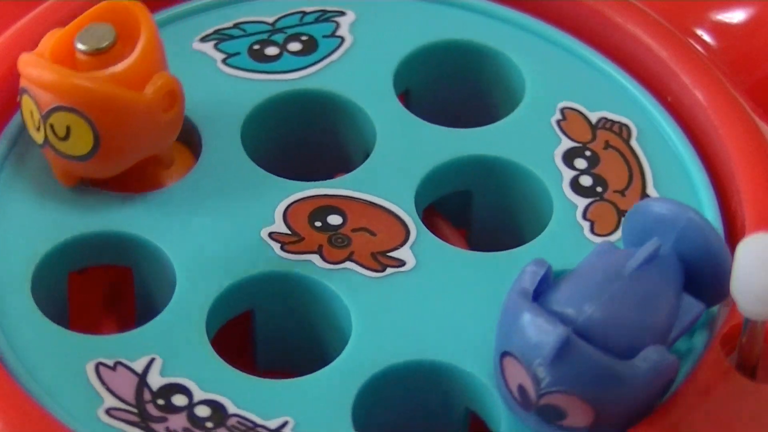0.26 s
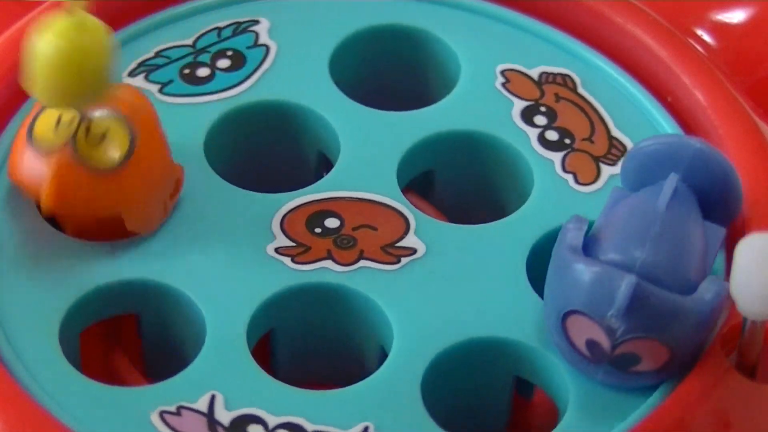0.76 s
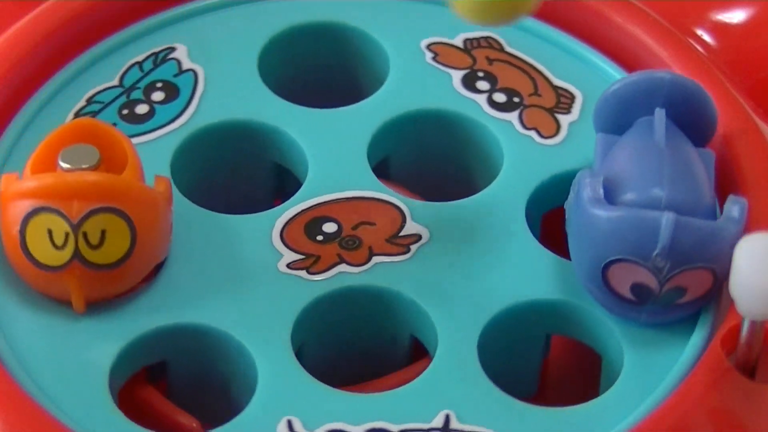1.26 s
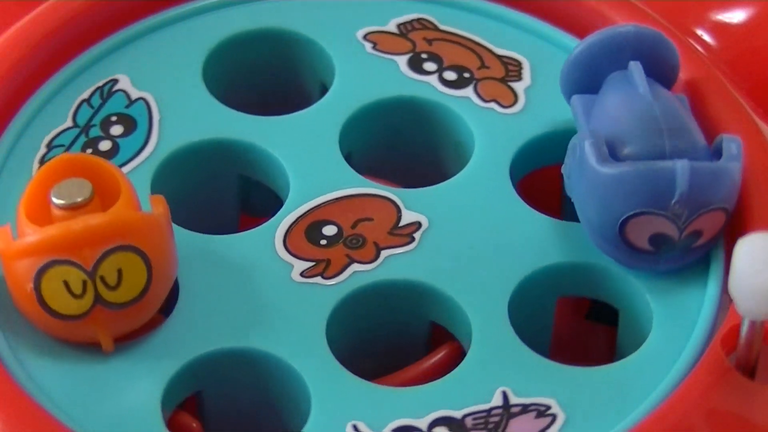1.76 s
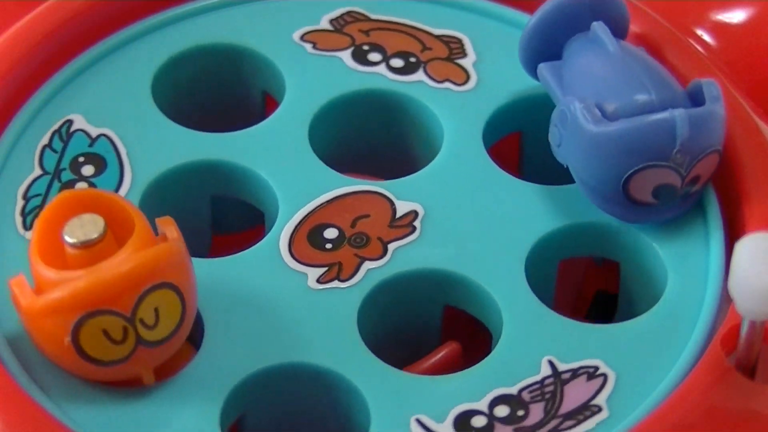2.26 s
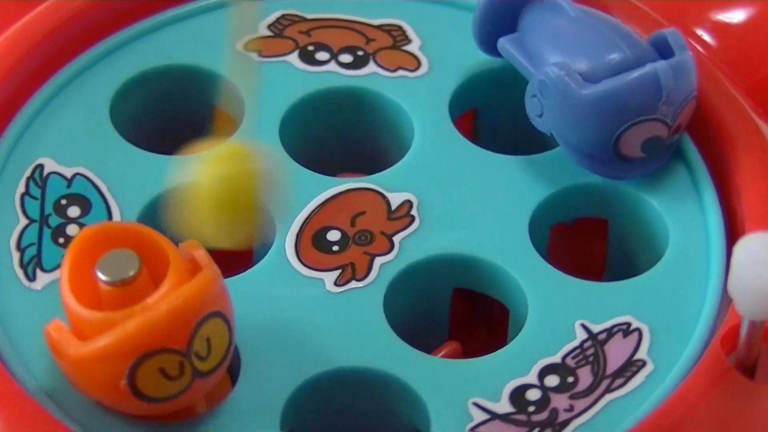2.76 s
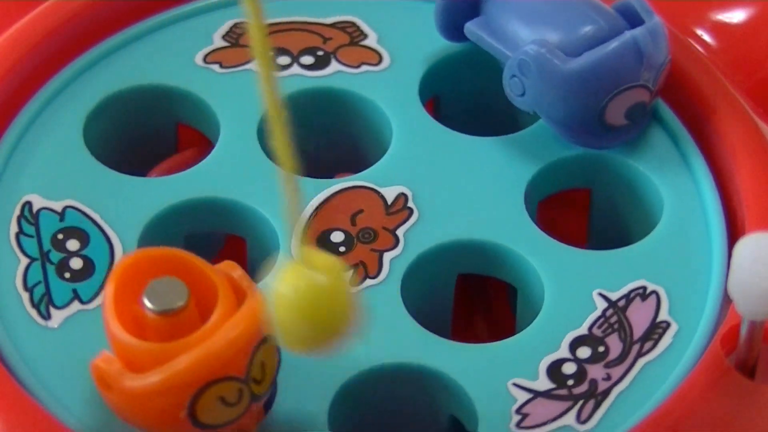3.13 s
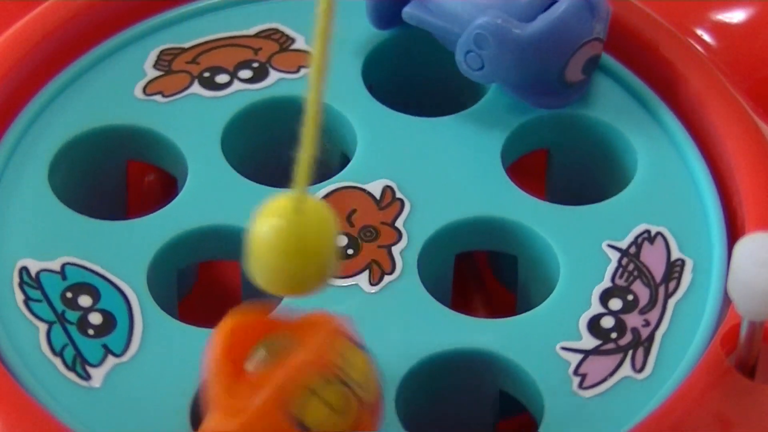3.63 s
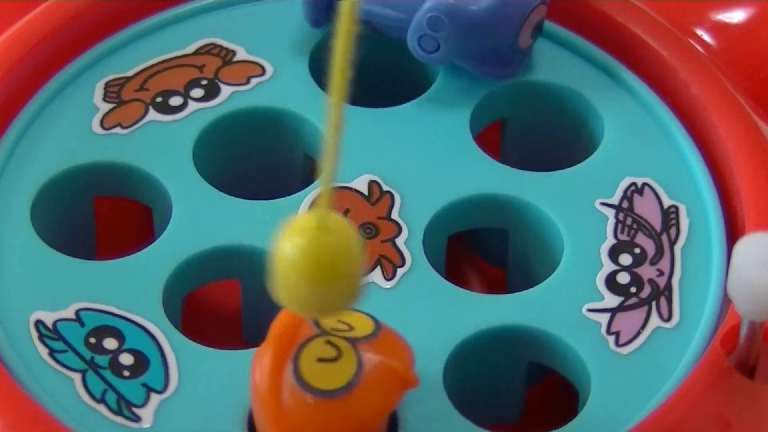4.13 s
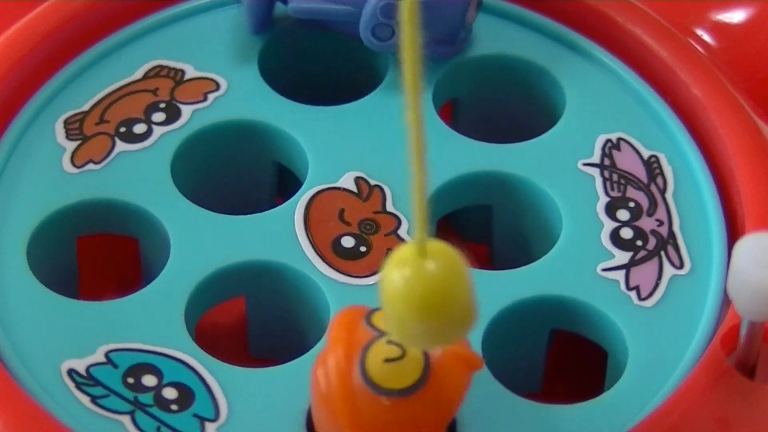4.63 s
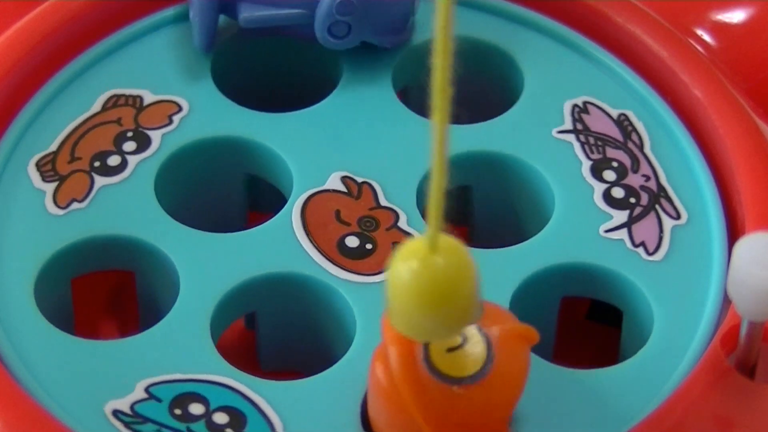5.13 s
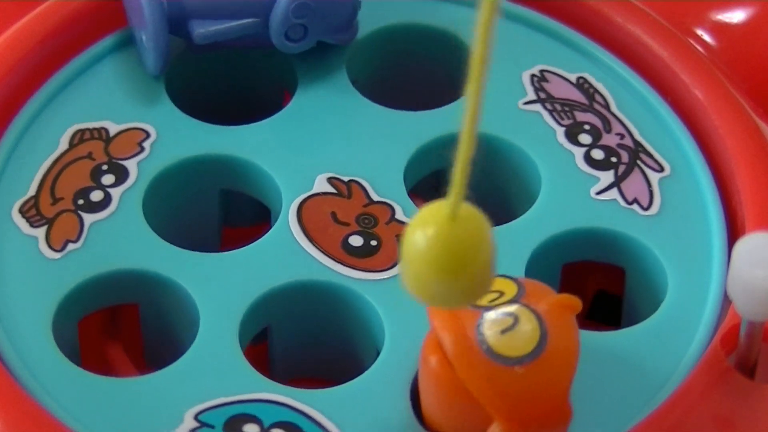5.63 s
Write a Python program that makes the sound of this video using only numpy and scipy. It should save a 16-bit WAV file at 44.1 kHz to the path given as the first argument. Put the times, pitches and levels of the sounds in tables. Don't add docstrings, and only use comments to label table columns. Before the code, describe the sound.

Loose plastic gears chatter rapidly inside a hollow toy shell, with small metallic pings and two sharp plastic taps, over faint room hum.

```python
import sys
import numpy as np
from scipy import signal
from scipy.fft import rfft, irfft, next_fast_len
from scipy.io import wavfile
from scipy.ndimage import uniform_filter1d

SR = 44100
rng = np.random.default_rng(int(sys.argv[2]) if len(sys.argv) > 2 else 0)


def undo_db(level):
    steps = np.asarray(level, float) / 20
    return 10 ** steps


def waveform_to_disk(signal):
    frames = np.transpose(np.atleast_2d(signal))
    scaled = np.clip(frames, -1, 1) * 32767
    samples = np.round(scaled).astype(np.int16)
    wavfile.write(sys.argv[1], SR, samples)


N = 259730

# time_s, tooth_peak_db, bite_db (highs over middle)
MESH = [(0.0, -18, -5.5), (0.45, -16.5, -1.5), (0.95, -17, -2), (1.1, -17.5, -0.6), (1.7, -21, -4),
        (2.0, -20, -4.5), (2.8, -17.5, -3.4), (3.0, -19, 6.5), (3.15, -17, -6.5), (3.3, -15.0, -4.5),
        (3.9, -22.5, -6.5), (4.15, -22.5, -4.5), (4.75, -22, -6), (4.95, -20, -1.5), (5.15, -24, -6.5),
        (5.5, -20.5, -2), (5.65, -18.5, -2), (5.89, -33, -6.5)]
# start_s, teeth_count, second_tooth_delay_periods, second_tooth_extra_db
RUNS = [(0.0043, 6, -0.12, -18.5), (0.0814, 14, -0.17, -9), (0.2563, 5, 0.1, -4), (0.323, 13, 0.05, -7),
        (0.4694, 10, -0.013, -6), (0.593, 17, -0.13, 3), (0.7968, 19, -0.29, 3), (1.01, 13, 0.24, 2),
        (1.1528, 21, -0.23, 14.5), (1.3947, 8, -0.22, -3), (1.5181, 10, -0.19, -5), (1.6585, 27, -0.3, -15),
        (2.0704, 14, 0.31, 14), (2.2747, 12, 0.15, 2), (2.472, 12, 0.19, 12.5), (2.6496, 5, 0.18, 1),
        (2.7362, 14, 0.1, -11.5), (2.921, 8, -0.13, 2), (3.053, 19, 0.096, 4), (3.3062, 19, -0.2, 7),
        (3.5304, 6, 0.1, 10.5), (3.6257, 17, -0.0077, 6), (3.8357, 12, -0.013, 2), (4.0172, 6, 0.061, -12),
        (4.1181, 17, 0.16, -9), (4.3815, 16, -0.16, 2), (4.6548, 20, 0.12, -1), (4.9877, 19, 0.13, -2),
        (5.311, 10, 0.18, -4), (5.4819, 27, 0.12, 6)]
# time_s, middle_db, high_db (over the usual tooth)
ODD_TEETH = [(0.105, 6, 9), (0.256, 0, 7), (0.292, -19, -16.6), (1.154, 7, 5), (1.425, -1, -1),
             (1.488, 9.5, 9.5), (1.749, 4.1, 2), (1.811, 4.5, 7), (1.975, 5, 9), (2.056, -8.5, -11.0),
             (2.176, 5.5, 9), (2.217, 0, 6.8), (2.969, -24, -15), (3.019, -25, -9), (3.481, 5, 3),
             (3.515, 1, 7), (3.611, -3, -6), (4.034, 5, 16), (4.416, 5, 4), (4.553, -1, 4),
             (4.741, -30, -26), (5.04, -11, -11), (5.177, 6, 6), (5.21, 8, 10), (5.376, 0, 7.5),
             (5.409, 1, 6), (5.726, -8, 3), (5.763, -5, 12), (5.8, 5.5, 6), (5.873, 11, 18)]
# time_s, peak_db
BOOMS = [(0.182, -15.5), (0.2588, -17.5), (0.9078, -23), (1.1757, -23), (1.2316, -27), (1.3967, -21),
         (1.4257, -21.5), (1.4571, -39), (1.5194, -21), (1.5768, -23), (1.6332, -16.5), (1.6891, -15.5),
         (1.717, -26), (1.8128, -19.5), (1.8726, -16.5), (1.934, -21), (1.9944, -24), (2.0896, -21.5),
         (2.1789, -21.5), (2.2064, -21), (2.2353, -18), (2.804, -23), (3.4715, -18.5), (3.5169, -27),
         (3.5808, -26), (5.0574, -25), (5.1607, -20), (5.2964, -29), (5.3627, -28), (5.4839, -25)]
# pitch_hz, width_hz, level_db
SHELL = [(1271.6, 121, 0), (2002, 110, -2), (2044, 43, -14.5), (3470, 200, -0.5), (3894, 150, -5),
         (4632, 370, -1), (6850, 64, -1), (8060, 37, -2), (8910, 125, -4), (10260, 320, -11.5),
         (10970, 240, -15), (13260, 210, -11),
         (1075, 71, -5.5), (1796, 134, -6), (12200, 2500, -12)]
# pitch_hz, density_db (per Hz)
CRACK = [(240, -52), (400, -24), (850, -17.5), (1270, -2), (1430, -8.5), (2040, -1.5), (3050, 1),
         (3450, -6.5), (4620, -3), (5640, -5.5), (10800, -5), (13300, -35), (15800, -31)]
# pitch_hz, density_db (per Hz)
RUB = [(240, -50), (400, -8), (877, 0.5), (1270, 0), (1570, -1), (4620, -4.5), (6090, -10.5), (13100, -56),
       (15800, -35)]
# pitch_hz, time_s, reach_s, level_db
SWAY = [(1274, 1.38, 0.37, 3), (2026, 0.43, 0.12, 7), (1980, 0.74, 0.27, 7.5), (4632, 0.48, 0.083, 0),
        (8060, 1.9, .6, -5), (8060, .3, .4, -3), (2010, 1.3, .15, -3), (10600, 3.71, .03, 12),
        (1770, 3.72, .04, 9), (10700, 2.8, .08, 0), (1966, 1.8, 0.6, -8.5), (2040, 3.55, 0.18, 1),
        (3395, 1.5, 0.59, 4), (3470, 2.105, 0.18, 1), (3500, 3.84, .4, -4), (3520, 5.9, 1, -1),
        (4632, 0.31, 0.15, 4), (4632, 1.56, 0.17, -9.5), (4632, 3.4, 0.087, 3), (4632, 5.2, 0.13, 0.5),
        (6470, 0.78, 0.25, 5), (6870, 2.3, 0.79, -4), (6800, 3.83, .2, 5), (6870, 3.0, 0.41, 1),
        (6870, 5.5, .2, 0), (10700, 0.83, 0.35, 11), (10600, 2.74, .2, -4), (10500, 4.3, 0.84, -15),
        (10740, 5.65, .15, 4)]
# time_s, length_s, low_db, middle_db, high_db
SCRAPES = [
    (0.699, 0.026, -29, -28, -29),
    (0.718, 0.031, -22, -29, -26),
    (0.747, 0.017, -15.5, -45, -51),
    (2.613, 0.029, -27, -21.5, -33),
    (3.709, 0.023, -36, -21, -16.5),
    (3.73, 0.019, -22, -35, -38),
    (3.742, 0.025, -33, -30, -35),
    (0.306, 0.012, -37, -36, -49),
    (4.659, 0.028, -35, -29, -55),
]
ZONES_HZ = [1500, 4500, 11000]
# time_s, peak_db, pitch_hz
FLICKS = [(0.081, -20, 4500), (0.1056, -19, 4680), (0.1555, -24, 4830), (0.182, -20, 4690),
          (0.285, -28, 4760), (0.2975, -18, 4450), (0.322, -30, 4500), (0.3576, -24, 4490),
          (0.381, -37, 4700), (0.393, -18, 4480), (0.4366, -24, 4520), (3.6627, -19, 4640),
          (4.0362, -19, 4680), (4.1654, -23, 4580), (4.4169, -16.5, 4560), (4.517, -23, 4630),
          (4.5785, -21, 4650), (4.6209, -26.5, 4630), (4.774, -21, 4670), (4.8738, -27, 4610),
          (4.9057, -20, 4680), (4.9184, -22.5, 4480), (4.9387, -16.5, 4600), (4.9721, -23.5, 4600),
          (5.1057, -25, 4640), (5.2001, -27, 4690), (5.243, -23.5, 4630), (5.3646, -26, 4500)]
# pitch_ratio, level_db, t60_s
ROD_MODES = [(0.999, -2.5, 0.074), (1.07, -1.5, 0.038), (1.473, -10.5, 0.08)]
# time_s, peak_db, pitch_hz, t60_s
TAPS = [
    (0.697, -15, 3900, .03),
    (0.7098, -4, 1900, .004),
    (0.755, -32, 280, .15),
    (3.711, -14, 1700, .05),
    (3.7378, -4, 5800, .0025),
]
# pitch_hz, density_db (per Hz)
ROOM_AIR = [(13, -42), (22, -14), (38, -7.5), (113, -2.5), (140, 0), (204, -5), (254, -6), (320, -0.5),
            (410, -17), (467, -8.5), (700, -9.5), (910, -40), (1540, -120)]
# pitch_hz, level_db
HUM = [(48.4, -64.5), (150.7, -57), (258.4, -54.5)]
HUM_WIDTH_HZ = [0.24, 3, 16]
# pitch_hz, side_minus_mid_db
WIDTH = [(60, -10), (120, -5.5), (240, -12.5), (480, 1), (950, -24.5), (1890, -15), (3770, -11), (7520, -3),
         (15000, -11.5)]
# pitch_hz, left_minus_right_db
LEAN = [(30, 3), (60, 4), (240, 0.6), (3800, -0.35), (15000, -0.5)]
# pitch_hz, level_db
MICROPHONE = [(13650, -0.5), (14300, -1), (15700, -6), (15900, -27), (16500, -31)]


def gears():
    contacts = teeth(soft_db=2.0, uneven_db=1.92, jitter_s=.0007, boom_share=0.59)
    contacts[:, 1:] -= contacts[:, 1:].mean(0) - contacts[:, 2].mean()
    white = rng.standard_normal((2, N))

    def force(hz, spread_db, kick, scrape_db, rub_db):
        luck = rng.standard_normal((2, len(contacts)))
        slow = (hz / 4000) ** -.48
        at = (contacts[:, 0] + .0006 + .0005 * slow * luck[0]) * SR
        at = np.clip(at.astype(int), 0, N - 40)
        blows = np.zeros(N)
        blows[at] = undo_db(by_zone(hz, *contacts[:, 1:].T) + spread_db * luck[1])
        burst = fading(blows, 0.0013 * slow) - fading(blows, 0.0004 * slow)
        tail = undo_db(-16.5) * fading(blows, 0.0095)
        scraping = undo_db(scrape_db) * scrapes(hz)
        rubbing = undo_db(at_hz(RUB, hz)) * friction(hz, rub_db)
        noise = stereo_noise(hz, white)
        out = (1.074 * burst + tail + scraping + rubbing) * noise
        out[:, at + 30] += kick * min(1, 7000 / hz) * blows[at] * rms_each(noise[:, at + 30])
        return out

    out = 0
    edges = 400 * 2 ** np.arange(0, 5.6, .4)
    for low, high in zip(edges, edges[1:]):
        hz = np.sqrt(low * high)
        drive = force(hz, spread_db=0.8, kick=2.06, scrape_db=3.5, rub_db=-3.0)
        out = out + undo_db(at_hz(CRACK, hz) + 2.5) * band(drive, low, high)
    for hz, width_hz, db in SHELL:
        drive = sway(hz, depth=1.36) * force(hz, spread_db=1.5, kick=4.9, scrape_db=2.0, rub_db=-4)
        out = out + undo_db(db + 7) * resonance(drive, hz, width_hz)
    return out


def teeth(soft_db, uneven_db, jitter_s, boom_share):
    s, mesh, bite = np.transpose(MESH)
    ends = [row[0] for row in RUNS[1:]] + [N / SR]
    times, turns = [], []
    for (start, count, limp, second_db), end in zip(RUNS, ends):
        k = np.arange(round(count))
        times.append(start + (end - start) * (k + limp * (k % 2)) / len(k))
        turns.append(second_db * (k % 2 - .5))
    t, turn_db = np.concatenate(times), np.concatenate(turns)
    luck = rng.standard_normal((600, 4))[:len(t)].T
    t = t + jitter_s * luck[0]
    turn_db = turn_db + 1.87 * np.cos(2 * np.pi * (np.arange(len(t)) - 6.1) / 24.4)
    usual_db = np.interp(t, s, mesh) + soft_db
    middle_db = usual_db + 0.23 * turn_db + uneven_db * luck[1]
    high_db = middle_db + np.interp(t, s, bite) + .6 * turn_db + 1.2 * luck[2]
    low_db = -28.5 + boom_share * (usual_db - usual_db.mean()) + 0.28 * turn_db + 2.0 * luck[3]
    for when, db, bright_db in ODD_TEETH:
        k = np.argmin(abs(t - when))
        t[k] = when
        middle_db[k] = usual_db[k] + db
        high_db[k] = usual_db[k] + np.interp(when, s, bite) + bright_db
    for when, db in BOOMS:
        low_db[np.argmin(abs(t - when))] = db - 2
    return np.transpose([t, low_db, middle_db, high_db])


def friction(hz, rub_db):
    s, mesh, bite = np.transpose(MESH)
    start, count = np.transpose(RUNS)[:2]
    teeth_per_s = count / np.diff(np.r_[start, N / SR])
    speed = np.interp(s, start, uniform_filter1d(teeth_per_s, size=3))
    firm = mesh - mesh.mean()
    level_db = by_zone(hz, .17 * firm, .2 * firm, .3 * firm + bite - bite.mean())
    speed_db = .12 * (speed - speed.mean())
    return slowly(s, undo_db(level_db + rub_db - 31 + speed_db))


def scrapes(hz):
    out, t = np.zeros(N), np.arange(-2000, 2000)
    for s, length, *zones_db in SCRAPES:
        out[round(s * SR) + t] += undo_db(by_zone(hz, *zones_db)) * np.exp(-(2 * t / SR / length) ** 2)
    return out


def sway(hz, depth):
    when = np.arange(0, N / SR + .05, .05)
    db = 0
    for centre, s, reach, swell_db in SWAY:
        nearness = (np.log(hz / centre) / 0.04) ** 2 + ((when - s) / reach) ** 2
        db = db + np.exp(-nearness) * swell_db
    return slowly(when, undo_db(depth * (db - db.mean())))


def axle():
    out, t = np.zeros(N), np.arange(SR // 10) / SR
    for s, db, hz in FLICKS:
        luck = rng.standard_normal((3, 2))
        ring = 0
        for (ratio, level_db, t60), (a, b) in zip(ROD_MODES, luck):
            decay = undo_db(level_db + 3.0 * a - 60 * t / t60)
            ring = ring + decay * np.sin(2 * np.pi * hz * ratio * t + 3 * b)
        i = round(s * SR)
        out[i:i + len(t)] += undo_db(db + 0.5) * (1 - np.exp(-t / 0.0009)) * ring
    return out * undo_db([[-.5], [.5]])


def taps():
    out, t = np.zeros(N), np.arange(SR // 4) / SR
    for s, db, hz, t60 in TAPS:
        i = round(s * SR)
        ring = undo_db(db - 60 * t / t60) * np.sin(2 * np.pi * hz * t)
        out[i:i + len(t)] -= band(ring, hz / 3, hz * 3)
    return out


def room_tone():
    air, edges = 0, 22 * 2 ** np.arange(0, 5.3, .4)
    white = rng.standard_normal((2, N))
    for low, high in zip(edges, edges[1:]):
        hz = np.sqrt(low * high)
        air = air + undo_db(at_hz(ROOM_AIR, hz)) * band(stereo_noise(hz, white), low, high)
    hum = 0
    for (hz, db), width_hz in zip(HUM, HUM_WIDTH_HZ):
        hum = hum + undo_db(db) * rms_one(resonance(stereo_noise(hz, white), hz, width_hz))
    return undo_db(-48.5) * rms_one(air) + hum


def hiss():
    mid, side = band(rng.standard_normal((2, N)), 10500, 16000)
    return undo_db(-55) * rms_one(mid + .6 * side * [[1], [-1]])


def at_hz(points, hz):
    table_hz, value = np.transpose(points)
    return np.interp(np.log(hz), np.log(table_hz), value)


def by_zone(hz, low, middle, high):
    share = np.interp(np.log(hz), np.log(ZONES_HZ), [-1, 0, 1])
    return middle + max(-share, 0) * (low - middle) + max(share, 0) * (high - middle)


def stereo_noise(hz, white):
    side = undo_db(at_hz(WIDTH, hz))
    balance = undo_db(at_hz(LEAN, hz) / 2 * np.array([[1], [-1]]))
    mix = np.array([[1, side], [1, -side]]) * balance
    return np.roll(mix @ white, rng.integers(N), axis=1)


def band(x, low_hz, high_hz):
    sos = signal.butter(2, [low_hz, min(high_hz, .45 * SR)], "band", fs=SR, output="sos")
    return signal.sosfilt(sos, x)


def resonance(x, hz, width_hz):
    r = np.exp(-np.pi * width_hz / SR)
    poles = [1, -2 * r * np.cos(2 * np.pi * hz / SR), r * r]
    return signal.lfilter([(1 - r * r) / 2, 0, (r * r - 1) / 2], poles, x)


def fading(x, seconds):
    return signal.lfilter([1], [1, -np.exp(-1 / (max(seconds, 1e-4) * SR))], x + 1e-18)


def slowly(when, gains):
    return np.repeat(np.interp(np.arange(0, N, 32) / SR, when, gains), 32)[:N]


def rms_one(x):
    return x / np.sqrt(np.mean(x ** 2) + 1e-20)


def rms_each(x):
    return x / np.sqrt(np.mean(x ** 2, axis=0) + 1e-20)


def scene():
    return gears() + axle() + taps() + room_tone() + hiss()


def top_cut(x):
    return signal.sosfilt(signal.butter(12, 16500, fs=SR, output="sos"), x)


def record(dry):
    size = next_fast_len(N)
    hz = np.arange(1, size // 2 + 2) * SR / size
    mix = irfft(rfft(dry, size) * undo_db(at_hz(MICROPHONE, hz)), size)[:, :N]
    return top_cut(mix)


dry = scene()
out = record(dry)
waveform_to_disk(out)
```